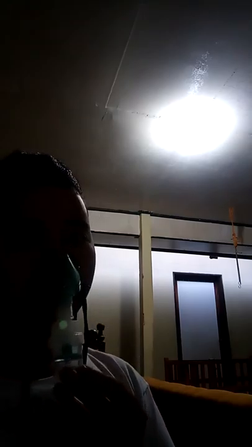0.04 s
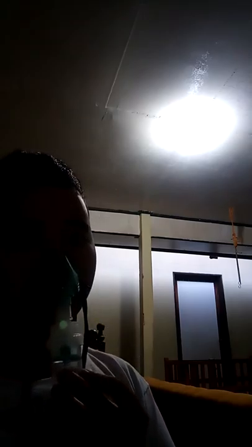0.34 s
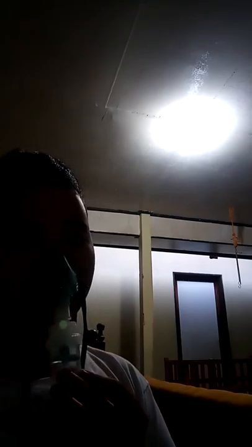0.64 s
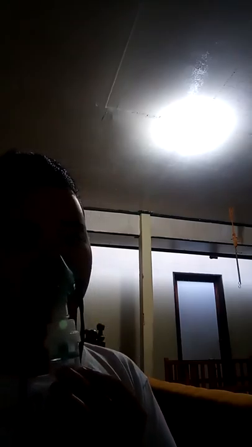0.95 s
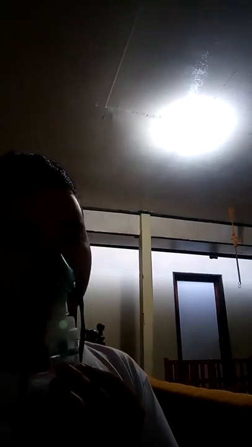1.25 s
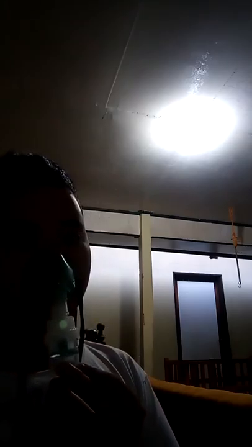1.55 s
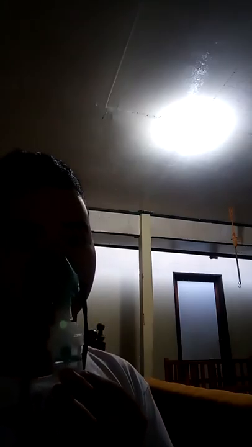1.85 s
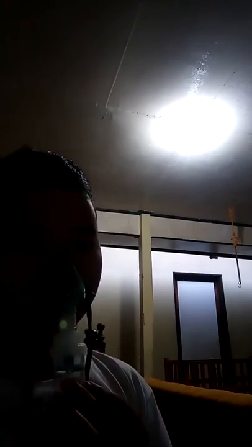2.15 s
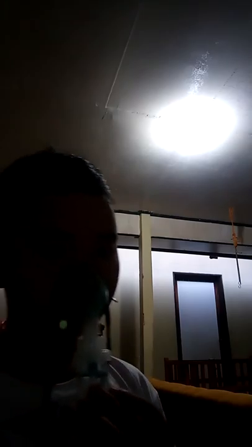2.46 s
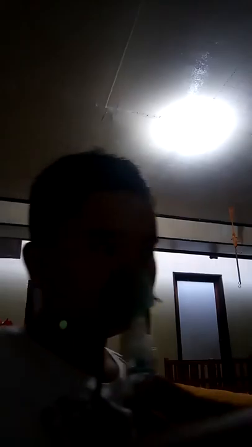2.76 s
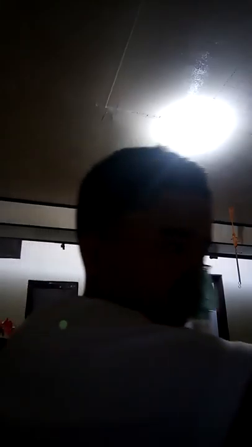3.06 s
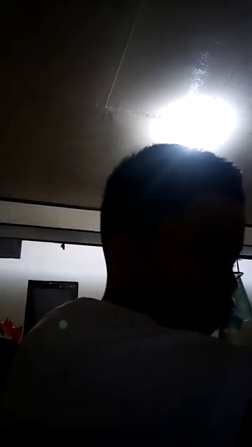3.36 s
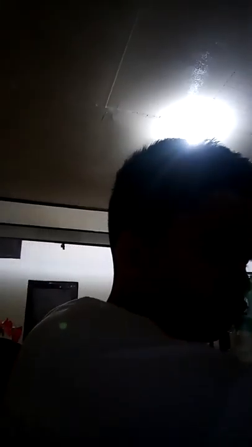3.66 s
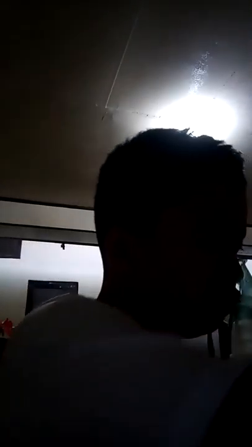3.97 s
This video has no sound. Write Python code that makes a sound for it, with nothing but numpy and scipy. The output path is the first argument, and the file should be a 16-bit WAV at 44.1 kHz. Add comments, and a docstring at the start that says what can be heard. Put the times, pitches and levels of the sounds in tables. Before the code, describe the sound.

A nebulizer hisses and sizzles steadily indoors, close to the microphone on the right, with a faint hollow note from the mask. Beneath it the compressor hums with a throb and a rapid valve rattle. A low electrical hum joins at about 3 seconds. Around 3.6 seconds the motor is switched off with a click and a soft shudder; the air sputters out in a breathy falling whistle by 4 seconds.

```python
"""A nebulizer's air jet hisses and sizzles indoors, close to the right microphone: turbulent noise
excites the resonances of cup and mask. Its piston compressor hums and slaps a valve once a turn.
Motor slip makes the hum throb; a mains hum joins late and beats against it.
The motor is switched off with a click, the housing shudders,
and the air runs out in a sputter and a falling whistle."""
import sys
import numpy as np
from scipy import signal
from scipy.fft import rfft, irfft, next_fast_len
from scipy.io import wavfile
from scipy.ndimage import map_coordinates

SR = 44100
rng = np.random.default_rng(int(sys.argv[2]) if len(sys.argv) > 2 else 0)


def to_wav(sig):
    """Store sig (one row per channel, or 1-D mono) as 16-bit WAV at the path in sys.argv[1].

    Samples outside -1..1 are clipped; the rate is SR.
    """
    pcm = np.clip(np.atleast_2d(sig), -1, 1) * 32767
    pcm = np.round(pcm).astype(np.int16)
    wavfile.write(sys.argv[1], SR, pcm.T)  # frames by channels


N = 176400
SHAFT_HZ, POWER_OFF_S = 56.52, 3.59


# bands of the jet: time_s, low_level_db, low_centre_hz, middle_level_db, sizzle_level_db
JET_BANDS = [(0, -28, 5360, -29.5, -21.5), (.5, -28, 5286, -30, -23.5), (1.2, -28.5, 5330, -28.5, -24.5),
             (1.95, -27, 5340, -28.5, -26), (2.3, -30, 5320, -29.5, -23.5),
             (2.55, -34.5, 5410, -31.5, -22.5), (2.8, -31, 5410, -33, -22), (3.2, -34.5, 5370, -37.5, -24),
             (3.7, -32.5, 5380, -35.5, -24), (3.8, -32.5, 5400, -34, -30),
             (3.85, -35.5, 5290, -33.5, -24.5), (3.885, -33.5, 5380, -36, -41),
             (3.925, -29.5, 5460, -36, -44), (4, -31, 5280, -37, -50)]
# last spurts of the emptying jet: peak_s, half_width_s, gain_db
LAST_SPURTS = [(3.79, .008, 3), (3.823, 0.0063, 2), (3.867, .007, 2), (3.923, .008, 4.5), (3.94, .004, 1)]
def jet(sputter_db=1.5, cup_gain_db=-12.5, cup_fade_s=.2):
    """Turbulent excitation: air and spray sputter through the resonances of cup and mask."""
    low_db, low_hz, middle_db, sizzle_db = curves(JET_BANDS)
    low = amp(low_db + sputter_db * wobble(130))
    low = low * unit(resonance(low_hz, width_hz=413) + amp(-8) * resonance(low_hz, width_hz=140))
    middle = amp(middle_db + sputter_db * wobble(90)) * resonance(7119, width_hz=238)
    cup = amp(low_db + cup_gain_db + sputter_db * wobble(60)) * resonance(3383, width_hz=165)
    cup *= np.clip(1 - (clock() - POWER_OFF_S) / cup_fade_s, 0, 1)
    spurts = amp(sum(db * np.exp(-((clock() - peak) / width) ** 2) for peak, width, db in LAST_SPURTS))
    return spurts * (low + middle) + cup + spray(sizzle_db)


# spectrum of the spray: frequency_hz, gain_db
SPRAY_SPECTRUM = [(9000, -65), (12600, -24), (12850, -27.5), (13650, -20), (14100, -22), (14650, -3.5),
                  (14850, -9), (15150, 1.5), (15480, -2), (15650, -13.5)]
def spray(level_db):
    """Random amplitude modulation: fast flicker makes the spray's treble noise sizzle."""
    return amp(level_db + 1.2 * wobble(260) + .62 * wobble(25)) * noise(SPRAY_SPECTRUM)


# spectrum of the rushing air: frequency_hz, gain_db
AIR_SPECTRUM = [(20, -35), (70, -21), (160, -15), (480, -12.5), (850, -10), (1200, -13), (1900, -10.5),
                (2300, -4), (3100, -5.5), (3400, -4), (3650, -13.5), (3900, -17), (4450, -8), (4700, -16),
                (5050, -11), (5750, -7.5), (6300, -4.5), (6550, -0.5), (6850, -21), (7400, -7.5),
                (8400, -12), (9300, -12), (9600, -14.5), (10100, -9.5), (11100, -20), (16000, -35)]
# envelope of the rush: time_s, level_db
AIR_ENVELOPE = [(0, -32.5), (3.55, -32), (3.68, -35), (3.85, -37.5), (4, -45.5)]
def airflow():
    """Turbulence: a broadband rush fades as the air runs out."""
    return amp(curves(AIR_ENVELOPE)[0] + wobble(120)) * noise(AIR_SPECTRUM)


# hollow note of the mask: time_s, pitch_hz, level_db
MASK_NOTE = [(0, 632.6, -40), (2.8, 634.4, -39.5), (3.3, 655, -37.5), (3.82, 655, -36), (4, 657, -46.5)]
def mask():
    """Cavity resonance: the mask narrows flow noise to a hollow note."""
    pitch_hz, level_db = curves(MASK_NOTE)
    return amp(level_db) * resonance(pitch_hz, width_hz=76)


# glide of the whistle: time_s, pitch_hz, level_db
WHISTLE_GLIDE = [(3.55, 2810, -55), (3.7, 2764, -44), (3.82, 2517, -39.5), (3.88, 2256, -37.5),
                 (3.93, 1947, -38.5), (4, 1660, -45)]
def whistle():
    """Flow-excited resonance: a breathy whistle swells and falls in pitch as the pressure runs out."""
    pitch_hz, level_db = curves(WHISTLE_GLIDE)
    return amp(level_db) * resonance(pitch_hz, width_hz=420)


# modes of the pump head: pitch_hz, bandwidth_hz, gain_db
HEAD_MODES = [(2174, 43, 0), (2382, 220, 1), (2376, 240, -3.5), (2590, 260, -11.5), (2920, 190, -15.5),
              (3500, 830, -26)]
def pump_head(hz):
    """Modal superposition: the head's frequency response is a band-limited sum of damped modes."""
    modes = sum(amp(db) * 1j * hz * width / (pitch ** 2 - hz ** 2 + 1j * hz * width)
                for pitch, width, db in HEAD_MODES)
    highpass = 1 / (1 + (1900 / (hz + 1)) ** 10)
    lowpass = 1 / (1 + 1j * hz / 5000) ** 2 / (1 + (hz / 3570) ** 8)
    return modes * highpass * lowpass


# envelope of the valve slaps: time_s, level_db
VALVE_ENVELOPE = [(0, -34.5), (2.5, -34), (2.95, -32), (3.2, -34.5), (3.55, -31)]
def valve(slap_turn=.405, scatter_db=.52, rattle_db=-11, rattle_s=.002):
    """Impact excitation: one slap a turn rings the pump head until the power is cut."""
    times = (np.arange(int(N / SR * SHAFT_HZ)) + slap_turn) / SHAFT_HZ
    running = np.clip(1 - (times - POWER_OFF_S) * SHAFT_HZ, 0, 1)
    sizes = amp(scatter_db * rng.standard_normal(len(times))) * running
    slaps = np.bincount(np.round(times * SR).astype(int), sizes, N)[:N]
    rattle = signal.lfilter([1], [1, -np.exp(-1 / (rattle_s * SR))], slaps) * rng.standard_normal(N)
    force = unit(slaps) + amp(rattle_db) * unit(rattle)
    return unit(filtered(force, pump_head)) * amp(curves(VALVE_ENVELOPE)[0])


# harmonics of the housing's hum: shaft_order, relative_level_db, throb_depth (0-1)
HUM_HARMONICS = [(1, -57, .05), (2, -50, .1), (4, -47.5, .32), (5, -48, .3), (7, -44, .22), (8, -59, .1),
                 (11, -53, .1), (12, -58, .1), (13, -52, .15), (14, -55, .25), (15, -54, .3),
                 (16, -57, .25), (17, -48, .75), (19, -58, .2), (21, -56, .3), (23, -58, .1), (24, -50, .2),
                 (25, -55, .1), (27, -59, .25), (28, -59, .2), (29, -52, .1), (31, -58, .1)]
def hum(throb_hz=6.83, mains_hz=119.87, mains_on_s=3.04, mains_db=-46, coast_s=.52, fade_db_per_s=139):
    """Modulation and beating: shaft harmonics throb with motor slip; mains hum beats with the second."""
    t = clock()
    since_off = np.maximum(t - POWER_OFF_S, 0)
    turns = np.cumsum(SHAFT_HZ * np.exp(-since_off / coast_s)) / SR
    phases = rng.random((64, 2))
    tones = np.zeros(N)
    for order, db, depth in HUM_HARMONICS:
        phase, lag = phases[order]
        throb = 1 + depth * np.cos(2 * np.pi * (throb_hz * t + lag * (order > 7)))  # low orders in step
        tones += amp(db + .5 + .4 * wobble(17)) * throb * np.sin(2 * np.pi * (order * turns + phase))
    mains_gain = amp(mains_db) * np.clip((t - mains_on_s) / .021, 0, 1)
    tones += mains_gain * np.sin(2 * np.pi * (mains_hz * t + phases[2, 0]))
    return np.sqrt(2) * tones * amp(-fade_db_per_s * since_off)


# modes of the switch: pitch_hz, gain_db, t60_s
SWITCH_MODES = [(983, -2, .05), (1065, 2, 0.026), (1320, -2, 0.026), (3500, 1, 0.022)]
def switch(start_s=3.657, gain_db=-25, attack_s=.0011, crack_t60_s=.045):
    """Damped free vibration: the plastic switch rings briefly over a crack of noise."""
    t = np.maximum(clock() - start_s, 0)
    ring = sum(amp(db - 60 * t / t60) * np.sin(2 * np.pi * hz * t) for hz, db, t60 in SWITCH_MODES)
    crack = amp(-60 * t / crack_t60_s) * noise([(300, -14), (1200, -5), (7000, 2), (12000, -11)])[0]
    return amp(gain_db) * (ring + crack) * (1 - np.exp(-t / attack_s))


# spectrum of the housing's shudder: frequency_hz, gain_db
SHUDDER_SPECTRUM = [(40, -31), (110, 5), (170, -8), (280, 3), (380, -5), (520, -12), (1200, -28),
                    (2500, -42)]
# envelope of the shudder: time_s, level_db
SHUDDER_ENVELOPE = [(3.54, -80), (3.59, -42), (3.7, -49), (3.82, -57), (3.87, -53), (3.92, -67), (4, -67)]
def shudder():
    """Transient vibration: the housing rumbles as the motor stops."""
    return amp(curves(SHUDDER_ENVELOPE)[0]) * noise(SHUDDER_SPECTRUM)[0]


def room(x, t60_s=.16):
    """Reverberation: diffuse reflections form an exponentially decaying tail of unit energy."""
    t = clock()[:SR // 3]
    tail = rng.standard_normal(len(t)) * amp(-60 * t / t60_s) * (t > .004)
    return signal.fftconvolve(x, tail / np.linalg.norm(tail))[:N]


# left channel relative to right: frequency_hz, gain_db
LEFT_SHADOW = [(60, -5.5), (380, -7), (700, -9), (1300, -8), (2400, -11.5), (3400, -9), (4000, -19),
               (5300, -14), (7100, -13), (8000, -20), (9300, -11), (10400, -13), (12000, -25), (15000, -28)]
def stereo(direct, diffuse, coherence, left_lead_s=.000745):
    """Acoustic shadowing: the left channel is duller and partly diffuse; its direct sound leads."""
    share = lambda hz: np.clip(along(coherence, hz), 0, 1)
    left = filtered(direct, lambda hz: share(hz) * np.exp(2j * np.pi * hz * left_lead_s))
    left += filtered(diffuse, lambda hz: np.sqrt(1 - share(hz) ** 2))
    return np.array([filtered(left, lambda hz: amp(along(LEFT_SHADOW, hz))), direct])


def amp(db):
    """Decibels to gain."""
    return 10 ** (np.asarray(db) / 20)


def unit(x):
    """Normalisation to rms 1."""
    return x / np.sqrt(np.mean(abs(x) ** 2) + 1e-20)


def clock():
    """Sample times in seconds."""
    return np.arange(N) / SR


def along(points, hz):
    """Interpolation of (frequency_hz, value) points on a log frequency axis."""
    frequencies, values = np.transpose(points)
    return np.interp(np.log(hz + 1), np.log(frequencies + 1), values)


def curves(rows):
    """Linear interpolation: one value per sample for each column after the time."""
    times, *columns = np.transpose(rows)
    return [np.interp(clock(), times, column) for column in columns]


def wobble(knots_per_s):
    """A smooth random curve: a spline through Gaussian knots."""
    return map_coordinates(rng.standard_normal(2048), [clock() * knots_per_s], mode="wrap")


def filtered(x, response):
    """Linear filtering: the spectrum of x times a complex frequency response."""
    size = next_fast_len(N + SR // 4)
    return irfft(rfft(x, size) * response(np.fft.rfftfreq(size, 1 / SR)), size)[..., :N]


def noise(spectrum):
    """Spectral shaping: two independent noises coloured by (frequency_hz, gain_db) points."""
    return unit(filtered(rng.standard_normal((2, N)), lambda hz: amp(along(spectrum, hz))))


def resonance(centre_hz, width_hz):
    """Quadrature modulation: two independent noise bands around a centre that may move."""
    lowpass = lambda hz: 1 / (1 + (hz / (.79 * width_hz)) ** 2 + (hz / width_hz) ** 4)
    in_phase, quadrature = filtered(rng.standard_normal((2, 2, N)), lowpass)
    phase = 2 * np.pi * np.cumsum(centre_hz * np.ones(N)) / SR
    return unit(in_phase * np.cos(phase) + quadrature * np.sin(phase))


# likeness of the channels for the air: frequency_hz, coherence (0-1)
AIR_COHERENCE = [(100, 0.95), (650, 0.71), (2500, 0.24), (5300, 0.27), (7100, 0.54), (10000, 0.22),
                 (15000, 0.55)]
# likeness of the channels for the compressor: frequency_hz, coherence (0-1)
COMPRESSOR_COHERENCE = [(100, 1), (400, .995), (700, .96), (1200, .92), (2400, .85), (6000, .6)]
def scene(room_db=-16):
    """Superposition: the compressor in the room and the nearby jet add in each channel."""
    knocks = valve() + switch()
    compressor = shudder() + hum() + knocks + amp(room_db) * room(knocks)
    compressor_pair = stereo(compressor, room(compressor), COMPRESSOR_COHERENCE)
    air_direct, air_diffuse = jet() + airflow() + mask() + whistle()
    return stereo(air_direct, air_diffuse, AIR_COHERENCE) + compressor_pair


def record(dry):
    """Band limiting: an ideal low-pass filter cuts the highest treble."""
    return filtered(dry, lambda hz: hz < 15560)


dry = scene()
out = record(dry)
to_wav(out)
```